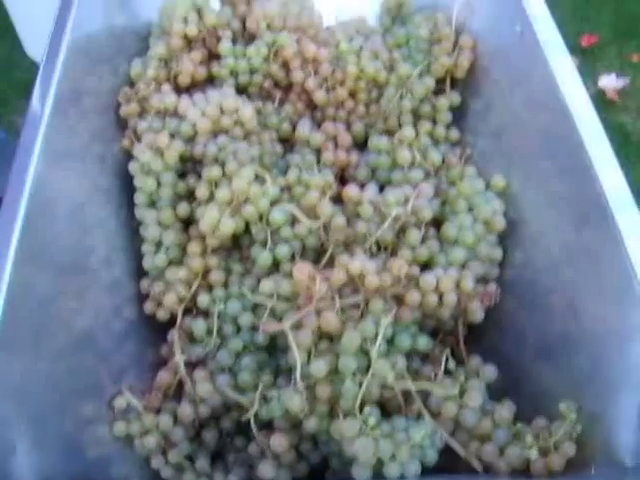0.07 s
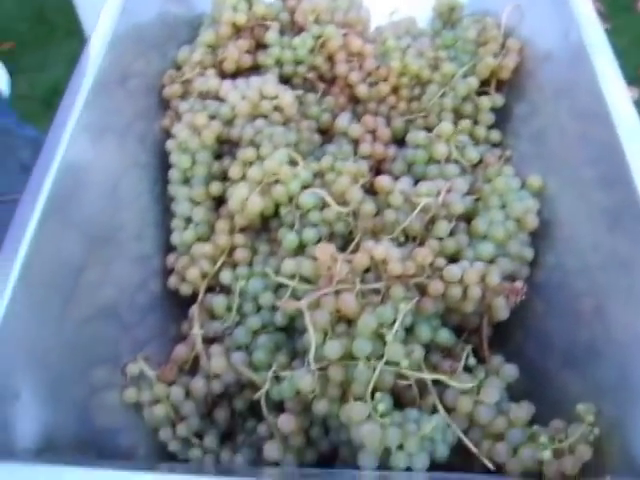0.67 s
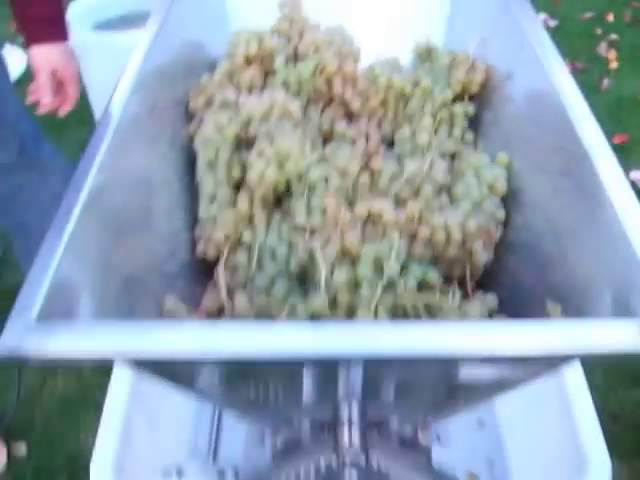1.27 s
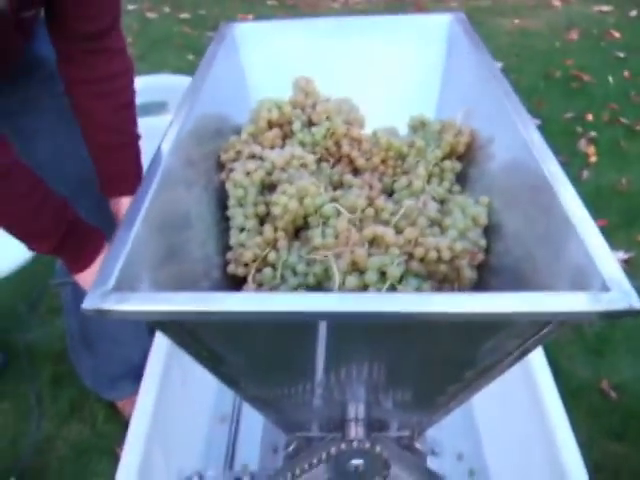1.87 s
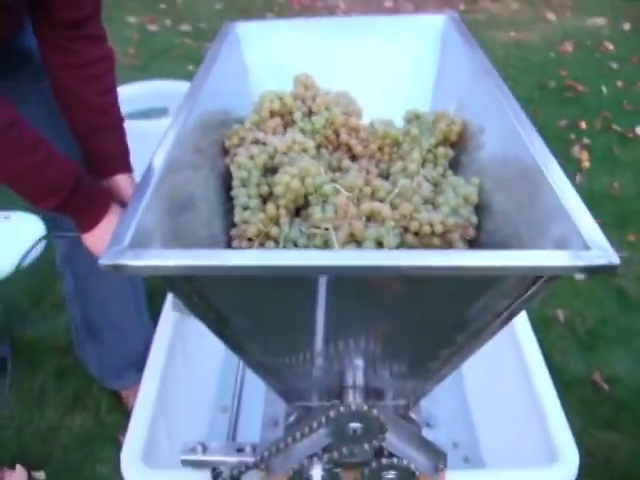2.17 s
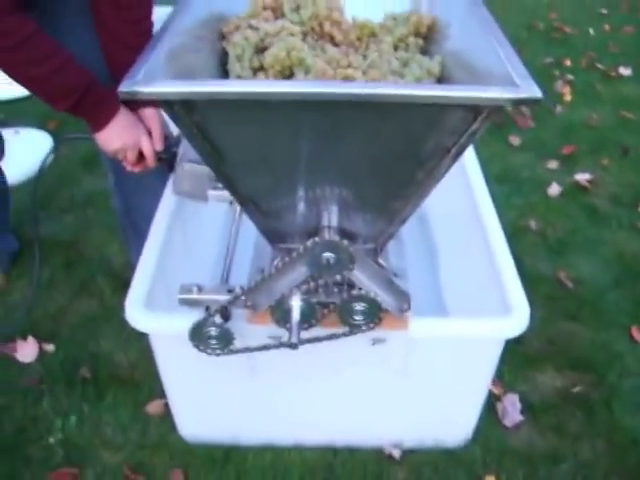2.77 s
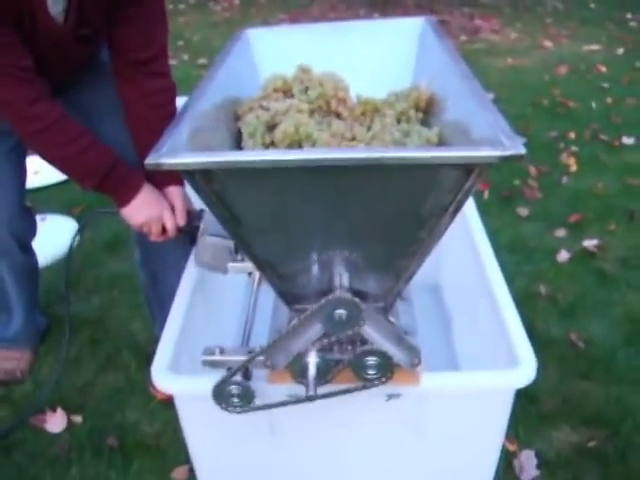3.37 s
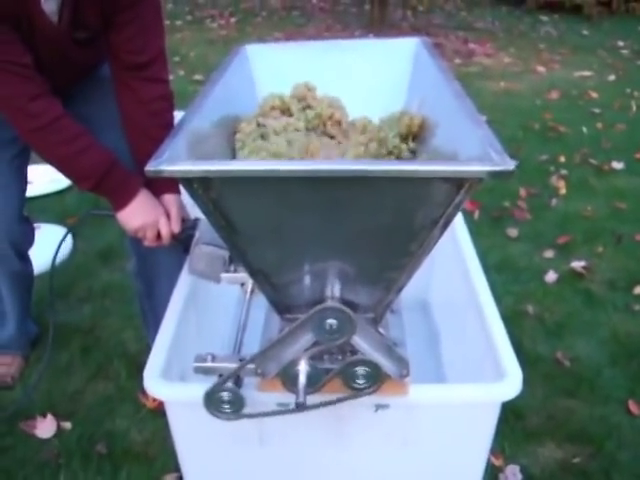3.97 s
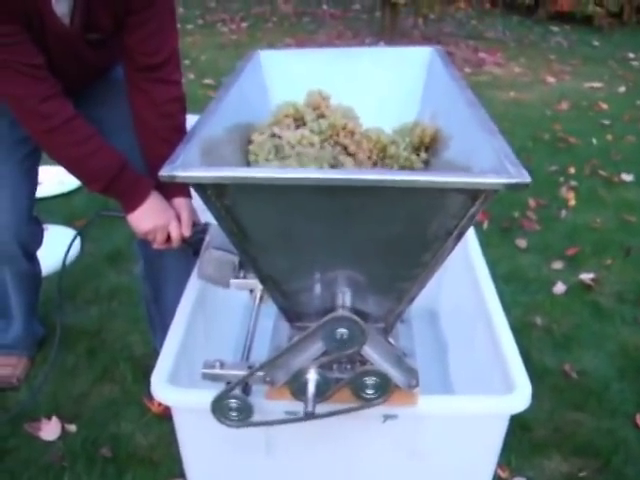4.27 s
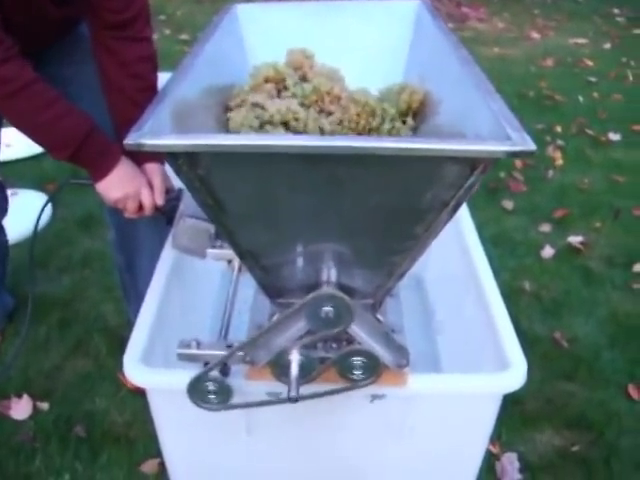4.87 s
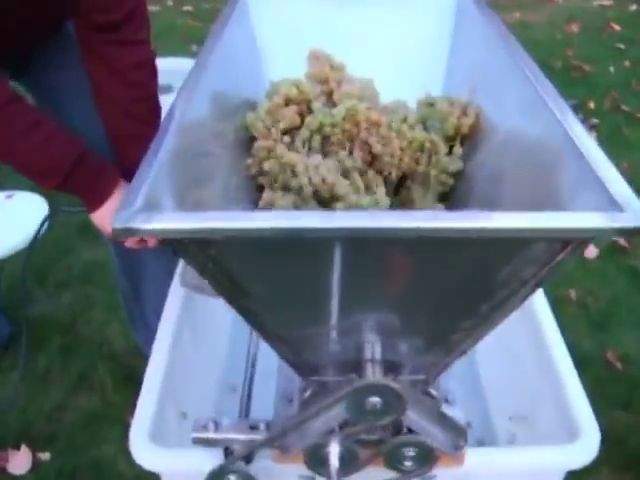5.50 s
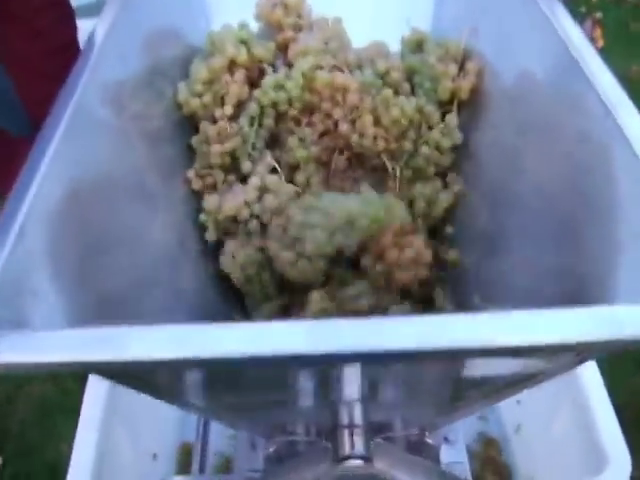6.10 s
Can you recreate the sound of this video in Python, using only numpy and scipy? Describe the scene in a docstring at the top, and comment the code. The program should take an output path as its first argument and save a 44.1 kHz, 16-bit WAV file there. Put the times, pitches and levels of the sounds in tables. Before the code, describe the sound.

Quiet outdoor air with some clicks, then a small electric crusher starts, its high, wavering whine running over grinding gears and rattling steel.

```python
"""Electric grape crusher on a lawn

In quiet outdoor air, clothes swish, a few sharp ticks sound close by and there is a hollow knock.
Then the motor is switched on and whines up to speed. Its gears grind, its brushes hiss, the chain
rattles the steel hopper, and the speed wavers as the rollers take the grapes.
It is all heard through a small hand-held camera."""
import sys
import numpy as np
from scipy.fft import rfft, irfft, next_fast_len
from scipy.io import wavfile
from scipy.ndimage import map_coordinates

SR = 44100
rng = np.random.default_rng(int(sys.argv[2]) if len(sys.argv) > 2 else 0)


def transcribe(signal):
    """Save signal, clipped to [-1, 1], as a 16-bit WAV file at the path in sys.argv[1]."""
    frames = np.atleast_2d(signal).T
    limited = np.clip(frames, -1, 1)
    pcm = np.round(limited * 32767).astype(np.int16)
    wavfile.write(sys.argv[1], SR, pcm)


N = 275184
TEETH = 6  # on the motor's small gear

# How fast the grapes let the motor run, in gear teeth a second: time_s, tooth_hz
MOTOR_SPEED = [(3.46, 1180), (3.63, 1185), (3.69, 1159), (4.02, 1177), (4.09, 1187), (4.27, 1163),
               (4.61, 1182), (4.67, 1145), (4.82, 1164), (4.98, 1220), (5.08, 1210), (5.23, 1236),
               (5.34, 1197), (5.46, 1185), (5.6, 1191), (5.91, 1296), (6.15, 1304), (6.22, 1251)]


def crusher():
    """The motor climbs to its running speed, working hardest when it is halfway there."""
    switch_on_s, spin_start_s, spin_up_s = 3.338, 3.327, 0.1773
    running_hz, = curves(MOTOR_SPEED)
    spun_up = 1 - np.exp(-np.maximum(clock() - spin_start_s, 0) / spin_up_s)  # from 0 to 1
    tooth_hz = running_hz * spun_up * (1 + 0.0015 * wobble(30))
    turns = np.cumsum(tooth_hz / TEETH) / SR
    work = 4 * spun_up * (1 - spun_up)
    octaves = np.log2(running_hz / np.median(running_hz))  # above the usual running speed
    age = np.maximum(clock() - switch_on_s, 0)
    slack_db = -6.5 * np.exp(-(age / 0.087) ** 4)  # quieter until the drive pulls tight
    scrape = 1 + 0.16 * np.cos(2 * np.pi * TEETH * turns)  # once for every tooth
    clatter = gear_grind(scrape, work, octaves) + brush_hiss(scrape, work, octaves) + hopper_rattle()
    emerge_db = -17 * np.exp(-(age / 0.091) ** 6)  # the whine rises out of the clatter
    tones = amp(emerge_db) * whine(turns, tooth_hz, work) + gear_growl(turns, spun_up, work)
    powered = np.clip(age / 0.0015, 0, 1)
    return powered * (tones + amp(slack_db) * clatter)


# Tones of the small gear, the fan and the motor's spinning contacts:
# times_tooth_rate, level_db, full_work_change_db, slip_rad, flutter_db
WHINE_TONES = [(2, -1, 0, .5, 2.0), (3, -.5, -2, .67, 2.5), (4, -2.5, -2, .7, 3), (6, -2.5, 2.5, 0.46, 3)]
# How well the housing gives off each pitch: pitch_hz, gain_db
HOUSING_RESPONSE = [(900, -48), (1450, -35), (1950, -29.5), (2170, -23.5), (2300, -30), (2420, -23),
                    (2530, -33.5), (2610, -32.5), (2800, -24.5), (3300, -22), (3480, -31.5), (3720, -30),
                    (3910, -23), (4100, -44.5), (4700, -27.5), (4900, -31), (5150, -34.5), (6000, -20.5),
                    (6600, -22.5), (7050, -26), (7450, -29.5), (7800, -41.5)]
# Moments when one tone swells or sinks: time_s, times_tooth_rate, change_db
WHINE_FLARES = [(3.44, 3, 5.5), (3.48, 3, 5.5), (3.535, 4, 10.5), (4.27, 2, 9), (4.6, 4, 5.5), (4.6, 6, 0),
                (4.76, 6, -8.5), (5.0, 4, 8.5), (5.2, 3, 5.5), (5.31, 2, 4), (5.34, 6, -17), (5.67, 2, 5.5),
                (5.81, 2, -6), (5.92, 2, -8), (6.07, 2, -6), (6.17, 2, 10.5), (6.23, 3, -11)]


def whine(turns, tooth_hz, work):
    """Tones grow and fade as the speed carries them past the pitches where the housing rings."""
    tones = []
    for multiple, db, work_db, slip, flutter_db in WHINE_TONES:
        flare_db = sum(change_db * swell(s, half_s=0.025)
                       for s, which, change_db in WHINE_FLARES if which == multiple)
        housing_db = along(HOUSING_RESPONSE, multiple * tooth_hz)
        drift_db = 1.3 * wobble(12)
        level_db = db + housing_db + work_db * work + flare_db + drift_db
        tones.append(amp(level_db) * tone(turns, multiple * TEETH, slip, flutter_db))
    # the slow wheel presses on the small gear every 7 shaft turns, so the lowest tone flutters
    beat = unit(1 + 0.38 * np.cos(2 * np.pi * turns / 7 + 1.52 * wobble(12)))
    return beat * tones[0] + sum(tones[1:])


# Weaker tones of the shaft and gears: times_shaft_speed, level_db, strain_change_db
GROWL_TONES = [(1.088, -50.5, -5), (1.5, -45, -2), (2.41, -40.5, 6), (3.005, -43.5, 1.5), (3.26, -45, 1.5),
               (4.49, -46.5, 5.5), (9.76, -42, 4), (12.275, -35, -1), (16.5, -43, 6.5), (23.77, -38.5, -1),
               (24.4, -41, 3)]


def gear_growl(turns, spun_up, work):
    """The wheels growl louder as they gain speed, and strain while the motor pulls them up."""
    strain = np.sqrt(work)
    growl = np.zeros(N)
    for multiple, db, strain_db in GROWL_TONES:
        level_db = db + strain_db * strain + 2.6 * wobble(7)
        growl += amp(level_db) * tone(turns, multiple, slip=0.71, flutter_db=3.5)
    return spun_up * growl


# Where the motor housing and gear case ring: pitch_hz, width_hz, gain_db
CASING_RINGS = [(1605, 326, -2.5), (1886, 210, 1.5), (2284, 220, -1.5), (3202, 313, 3), (3555, 580, -0.5)]


def gear_grind(scrape, work, octaves):
    """Scraping teeth make the casing ring, louder with more work or speed."""
    level_db = -23.5 + 2 * work + 1.5 * octaves + 0.71 * wobble(4.9) + wobble(60)
    return amp(level_db) * unit(ringing(scrape * impacts(per_s=7000, spread_db=0.5), CASING_RINGS))


# Tone colour of the motor's hiss: pitch_hz, gain_db
HISS_COLOUR = [(30, -17), (90, -13.5), (170, -5), (900, -5.5), (1200, -7.5), (2700, -7), (4150, -5.5),
               (4700, 1), (5400, 1), (6400, 1), (7100, -2), (7600, -4.5), (8000, -5.5)]


def brush_hiss(scrape, work, octaves):
    """The motor's brushes and cooling air hiss, louder with more work or speed."""
    level_db = -20.5 + 1.5 * work + 8 * octaves + 0.35 * wobble(90)
    return amp(level_db) * unit(coloured(scrape * impacts(per_s=14000, spread_db=2), HISS_COLOUR))


# Where the steel hopper and the tub ring: pitch_hz, width_hz, gain_db
HOPPER_RINGS = [(219.5, 41, 3), (316, 19, -4), (424, 34, -2.5), (669, 78, 4), (740, 280, 2.5),
                (890, 102, 4)]
# How the rattle rises and falls: time_s, level_db
RATTLE_LEVELS = [(3.35, -45), (3.4, -33), (3.47, -31.5), (3.7, -34.5), (3.95, -37), (4.2, -34), (4.7, -33),
                 (5.0, -38), (5.65, -33), (5.95, -28.5), (6.24, -28.5)]


def hopper_rattle():
    """The chain and rollers shake the hopper, the steel funnel that holds the grapes."""
    level_db = curves(RATTLE_LEVELS)[0] + 0.62 * wobble(25)
    return amp(level_db) * unit(ringing(impacts(per_s=900, spread_db=2), HOPPER_RINGS))


# Blows on the idle machine, then from the drive pulling tight: start_s, casing_db, tub_db, fade_s
BLOWS = [(0.184, -54, -35, 0.053), (1.7854, -37, -34.5, 0.026), (2.137, -35, -24, 0.16),
         (3.341, -20, -47, 0.078), (3.394, -25, -22, 0.14), (3.42, -17, -40, 0.044),
         (3.445, -16.5, -34, 0.1)]
# Where the plastic tub under the crusher rings: pitch_hz, width_hz, gain_db
TUB_RINGS = [(186, 52, 5), (427, 120, 0.5), (755, 210, 3), (1570, 490, -16)]
# The microphone picks up little deep bass from the knocks: pitch_hz, gain_db
KNOCK_BASS_CUT = [(70, -25), (150, 1)]


def knocks():
    """Each blow thumps the tub, then chatters briefly in it and in the casing."""
    casing_level, tub_level, hits = np.zeros((3, N))
    for s, casing_db, tub_db, fade_s in BLOWS:
        age = np.maximum(clock() - s, 0)
        fade = (1 - np.exp(-age / 0.001)) * amp(-60 * age / fade_s)
        casing_level += amp(casing_db) * fade
        tub_level += amp(tub_db) * fade
        hits[round(s * SR)] = amp(tub_db)
    thump = ringing(hits, TUB_RINGS)
    thump *= hits.max() / np.abs(thump).max()
    hollow = coloured(thump + tub_level * ringing_noise(TUB_RINGS), KNOCK_BASS_CUT)
    return hollow + casing_level * ringing_noise(CASING_RINGS)


# Sharp ticks close by: start_s, level_db, pitch_hz, rise_s, push_gain_db, grit_gain_db
CLOSE_TICKS = [(.1845, -34, 5800, 0.0005, -10, 2.5), (0.209, -33, 6900, .0007, -12, -1),
               (.2205, -33, 6200, 0.00062, -14, 3), (0.4252, -16.5, 6680, 0.00047, -3, -6),
               (.426, -23.5, 4300, 0.00083, 5, -6), (0.617, -35, 6330, 0.0011, 11.5, 2),
               (1.0198, -16.5, 5700, 0.00036, 5, 2), (1.0355, -27, 4440, 0.00032, -20, -3),
               (1.762, -25, 6840, 0.00066, -25, -6), (1.764, -20, 4080, .0006, -25, -7),
               (1.768, -16, 5800, 0.00074, -25, -1), (1.7709, -8, 5800, 0.00023, -7, -5),
               (1.7844, 4, 7210, 0.00067, -15, -11), (2.0971, 2.5, 7500, 0.00018, -1, -7),
               (2.2655, -30, 5850, 0.00044, 12, -5), (2.276, -30.5, 4370, 0.0012, -20, 1),
               (2.291, -33, 4520, .0008, -20, -6), (2.4407, -4.5, 6660, 0.00034, -33, -13)]
# Tone colour of the grit in a tick: pitch_hz, gain_db
GRIT_COLOUR = [(200, -19), (1500, -5), (3000, -5.5), (4800, 7.5), (8000, 1)]


def ticks():
    """Tiny hard contacts: a short bright note, some grit and a low push, then one weak bounce."""
    bounce_s, bounce_db = 0.0032, -16.5
    clicks, grit = np.zeros((2, N))
    t = np.arange(SR // 20) / SR
    for s, db, hz, rise_s, push_db, grit_db in CLOSE_TICKS:
        progress = t / rise_s
        burst = amp(db) * progress ** 2 * np.exp(2 - 2 * progress)
        note = burst * np.sin(2 * np.pi * hz * t)
        push = amp(db + push_db) * (1 - 4 * progress) * np.exp(-4 * progress)
        clicks[round(s * SR):][:len(t)] += note + push
        clicks[round((s + bounce_s) * SR):][:len(t)] += amp(bounce_db) * note
        grit[round(s * SR):][:len(t)] += amp(grit_db) * burst
    return clicks + grit * noise(GRIT_COLOUR)


def ping(start_s=1.7848, level_db=-36.5, pitch_hz=6230, fade_s=0.21):
    """The hardest tick leaves a thin ring."""
    age = np.maximum(clock() - start_s, 0)
    return amp(level_db - 60 * age / fade_s) * np.sin(2 * np.pi * pitch_hz * age)


# Soft swishes of clothing close by: middle_s, half_length_s, level_db
CLOTH_SWISHES = [(0.13, 0.13, -63), (0.387, 0.1, -50), (0.853, 0.081, -47), (1.067, 0.12, -43),
                 (1.343, 0.06, -43), (1.664, 0.13, -46.5), (2.077, 0.082, -44.5), (2.286, 0.2, -48.5),
                 (2.82, 0.05, -44), (3.04, .04, -47.5)]
# Tone colour of the cloth: pitch_hz, gain_db
CLOTH_COLOUR = [(1500, -21), (3000, -5.5), (4500, 0.5), (6300, 1.5), (7300, -1.5), (8000, -4)]


def clothing(steady_db=-50):
    """Cloth rubs in many tiny contacts: a steady rustle with swishes on top."""
    power = amp(steady_db) ** 2 + sum((amp(db) * swell(s, half_s)) ** 2
                                      for s, half_s, db in CLOTH_SWISHES)
    level = np.sqrt(power) * amp(1.6 * wobble(45))
    return level * unit(coloured(impacts(per_s=10000, spread_db=2), CLOTH_COLOUR))


# How the far-off wash of noise rises and falls: time_s, level_db
WASH_LEVELS = [(.1, -48), (.4, -47.5), (.6, -49.5), (1.1, -47), (1.65, -48.5), (1.85, -53), (2.1, -46.5),
               (2.6, -50.5), (3.3, -51)]
# Tone colour of that wash: pitch_hz, gain_db
WASH_COLOUR = [(60, -37), (120, -11.5), (250, -6.5), (450, -3), (580, -4.5), (750, -2.5), (1150, -4.5),
               (1700, -7.5), (2400, -9.5), (3500, -13), (6000, -24.5)]
# Faint swells far away: middle_s, half_length_s, level_db, pitch_hz, width_hz
FAR_SWELLS = [(.33, 0.18, -52.5, 2400, 130), (1.052, 0.069, -52.5, 1780, 200), (1.336, 0.11, -48, 750, 170),
              (3.064, 0.12, -50, 780, 90)]
# Tone colour of the low rumble: pitch_hz, gain_db
RUMBLE_COLOUR = [(15, -19), (35, -5), (55, -1.5), (75, 3.5), (130, -7), (300, -22)]


def outdoors():
    """A far-off wash with a few soft swells, a wavering low hum and a rumble."""
    wash_db, = curves(WASH_LEVELS)
    far = amp(wash_db + 0.4 * wobble(10)) * noise(WASH_COLOUR)
    for s, half_s, db, hz, width_hz in FAR_SWELLS:
        far += amp(db) * swell(s, half_s) * ringing_noise([(hz, width_hz, 0)])
    hum_db = np.interp(clock(), [1.7, 2.4], [-54.5, -60]) + 2 * wobble(16)
    hum = amp(hum_db) * np.sin(2 * np.pi * 51 * clock() + 0.7 * wobble(12))
    return far + hum + amp(-56.5) * noise(RUMBLE_COLOUR)


def tone(turns, multiple, slip, flutter_db):
    """A tone at a multiple of the shaft speed; loose gears shake its timing and loudness."""
    phase = 2 * np.pi * multiple * turns + slip * wobble(70)
    return unit(np.sin(phase) * amp(flutter_db * wobble(55)))


def impacts(per_s, spread_db):
    """Tiny contacts of uneven size at random times."""
    hits = rng.random(N) < per_s / SR
    return unit(hits * rng.standard_normal(N) * amp(spread_db * rng.standard_normal(N)))


def ringing(x, rings):
    """Pass x through a body that rings at the given pitches."""
    return filtered(x, lambda hz: sum(
        (-1) ** k * amp(db) * 1j * hz * width / (pitch ** 2 - hz ** 2 + 1j * hz * width)
        for k, (pitch, width, db) in enumerate(rings)))


def ringing_noise(rings):
    """Noise of strength 1 through a ringing body."""
    return unit(ringing(rng.standard_normal(N), rings))


def noise(colour):
    """Noise of strength 1 with the given tone colour."""
    return unit(coloured(rng.standard_normal(N), colour))


def coloured(x, colour):
    """Shape x with (pitch_hz, gain_db) points."""
    return filtered(x, lambda hz: amp(along(colour, hz)))


def filtered(x, response):
    """Turn each pitch in x up or down by response(hz)."""
    size = next_fast_len(N + SR // 2)
    return irfft(rfft(x, size) * response(np.fft.rfftfreq(size, 1 / SR)), size)[:N]


def along(points, hz):
    """Read between (pitch_hz, gain_db) points, with octaves evenly spaced."""
    pitches, db = np.transpose(points)
    return np.interp(np.log(hz + 1), np.log(pitches), db)


def curves(rows):
    """One value per sample for each column after the time."""
    times, *columns = np.transpose(rows)
    return [np.interp(clock(), times, column) for column in columns]


def wobble(per_s):
    """A smooth curve through per_s random values a second."""
    return map_coordinates(rng.standard_normal(int(N * per_s / SR) + 4), [np.arange(N) * per_s / SR])


def swell(middle_s, half_s):
    """A bell-shaped rise and fall."""
    return np.exp(-((clock() - middle_s) / half_s) ** 2 / 2)


def amp(db):
    """Decibels to gain."""
    return 10 ** (np.asarray(db) / 20)


def unit(x):
    """Scale to an average strength (rms) of 1."""
    return x / np.sqrt(np.mean(x ** 2) + 1e-20)


def clock():
    """Time of every sample in seconds."""
    return np.arange(N) / SR


def scene():
    """All sources at one microphone in the open air."""
    return (crusher() + knocks() + ticks() + ping() + clothing() + outdoors())[None]


# The camera cuts the highest treble on the way in: pitch_hz, gain_db
TREBLE_CUT = [(7700, 0.5), (8000, -3.5), (8300, -27), (8700, -90.5)]
# Strength of the treble mirrored above half the camera's sample rate: pitch_hz, gain_db
MIRROR_COLOUR = [(8000, -0.5), (8500, -6.5), (9000, -15.5), (9500, -24), (10000, -43), (10400, -69.5)]


def record(dry):
    """The camera opens after a moment, samples so slowly that treble is mirrored upward, and clips."""
    open_s, sample_hz, top_hz = 0.072, 16000, 10325
    opened = np.clip((clock() - open_s) / 0.0023, 0, 1)
    sound = coloured(dry[0] * opened, TREBLE_CUT)
    mirror = coloured(2 * sound * np.cos(2 * np.pi * sample_hz * clock()), MIRROR_COLOUR)
    return filtered(np.clip(sound + mirror, -1, 1), lambda hz: hz < top_hz)[None]


dry = scene()
out = record(dry)
transcribe(out)
```